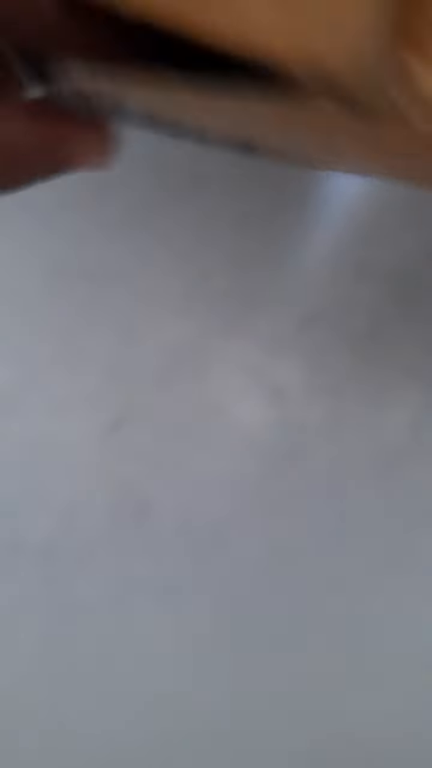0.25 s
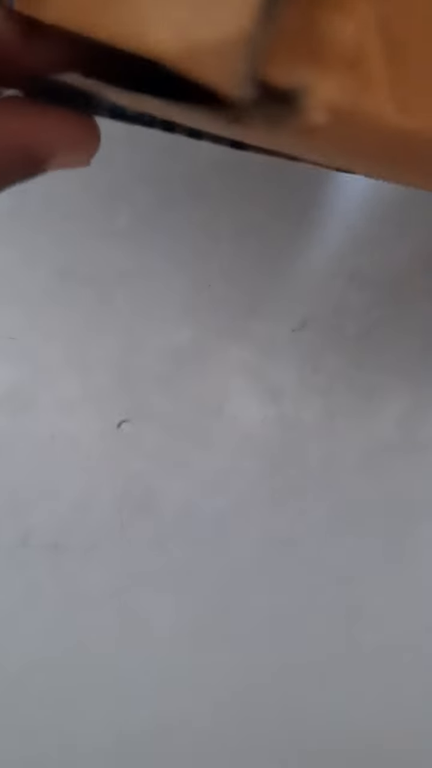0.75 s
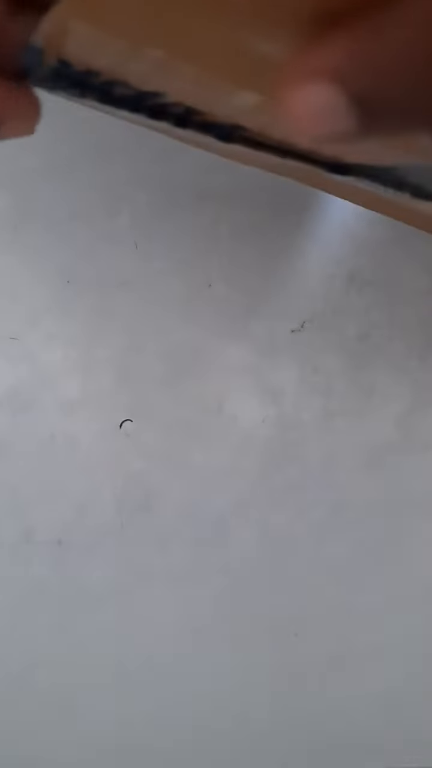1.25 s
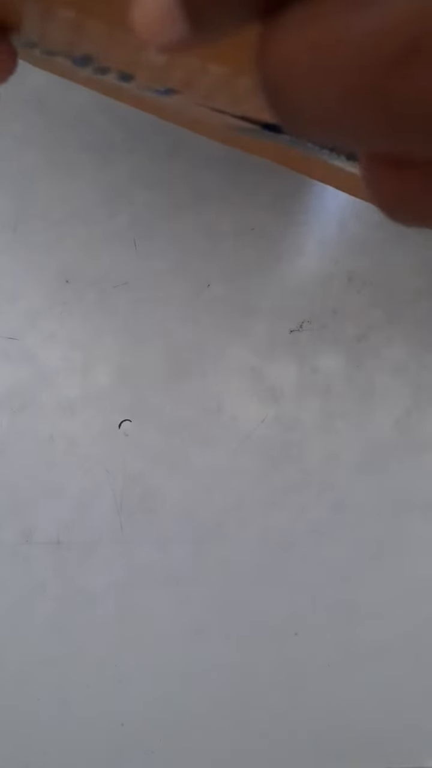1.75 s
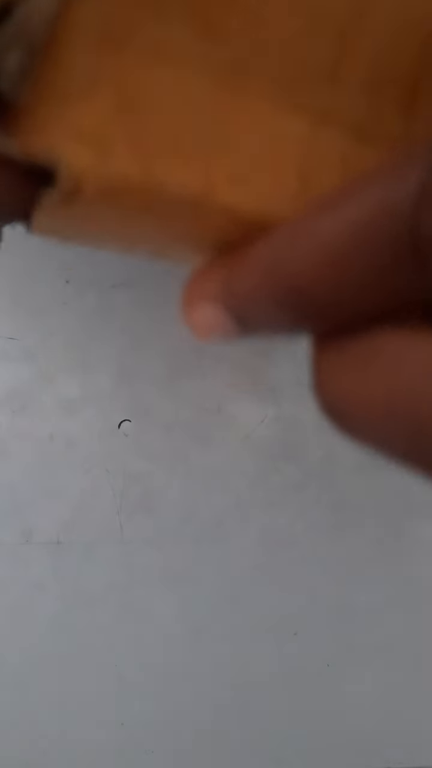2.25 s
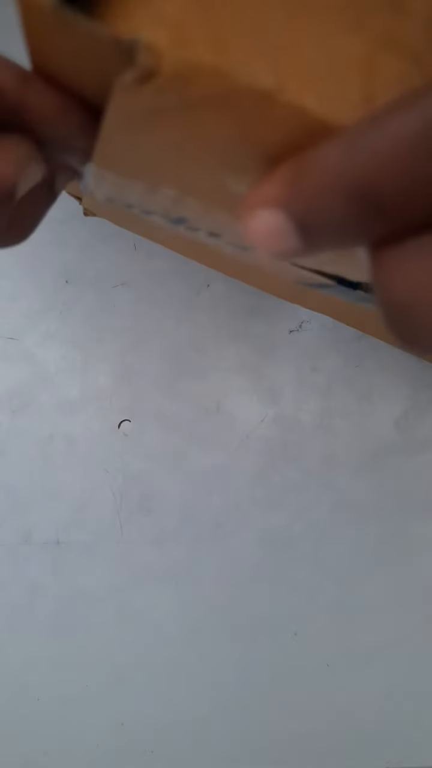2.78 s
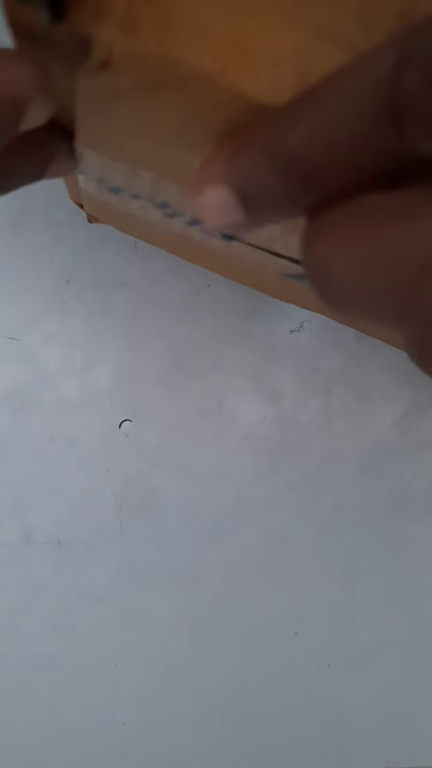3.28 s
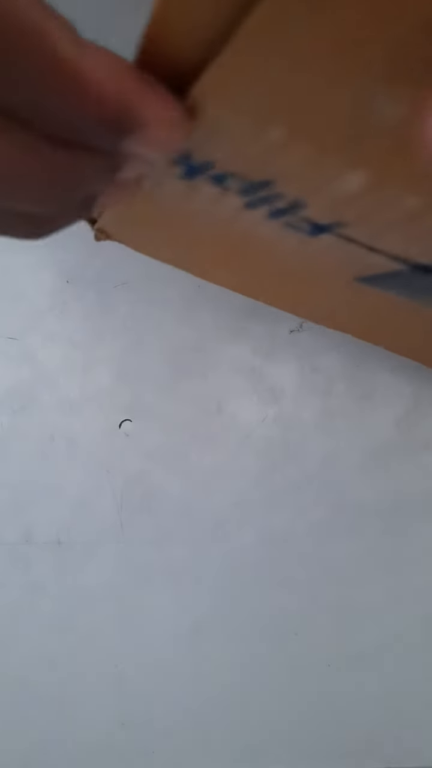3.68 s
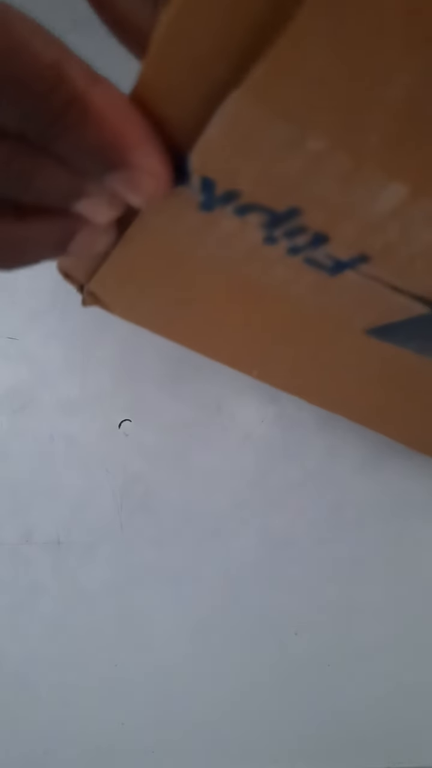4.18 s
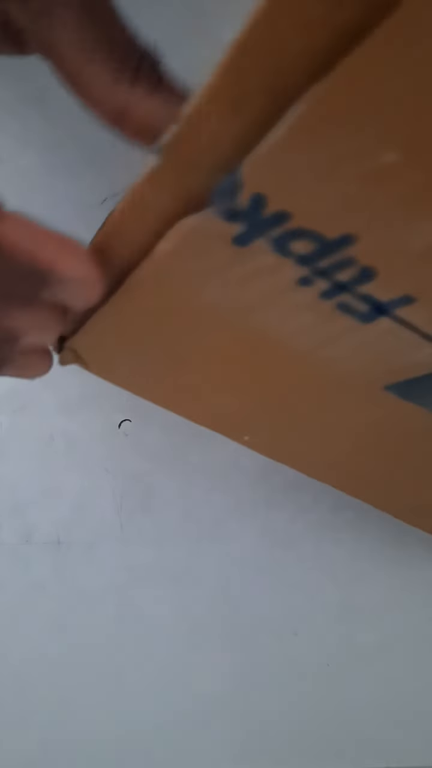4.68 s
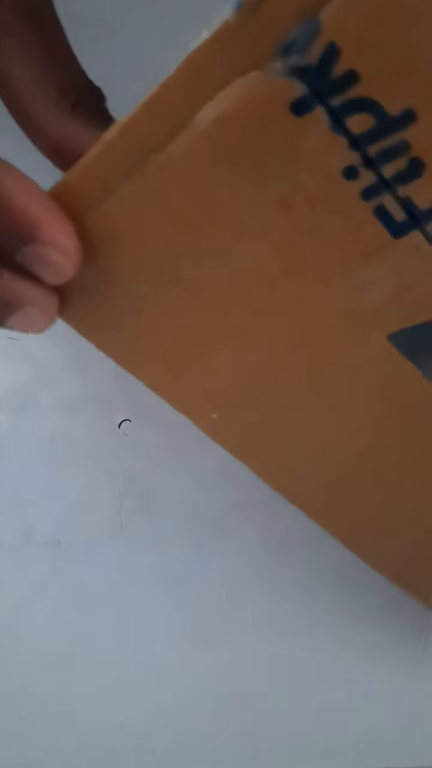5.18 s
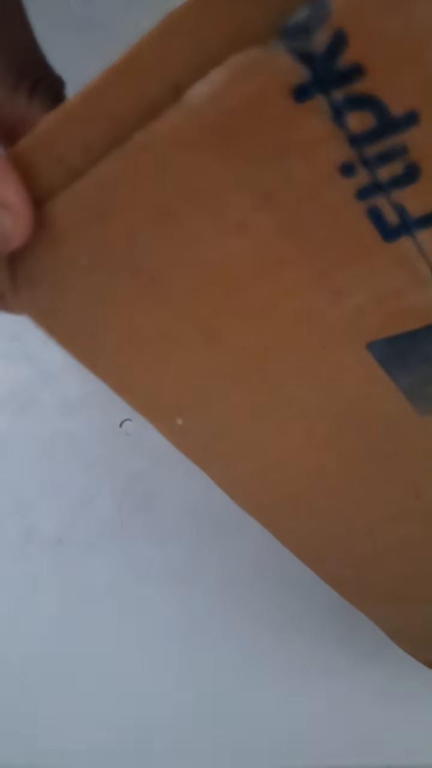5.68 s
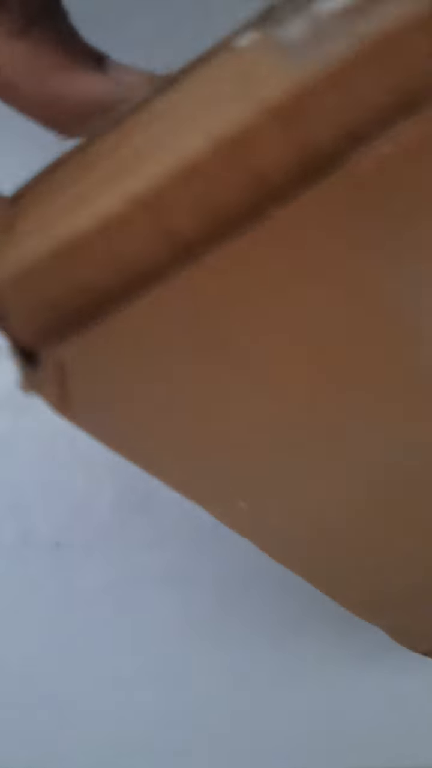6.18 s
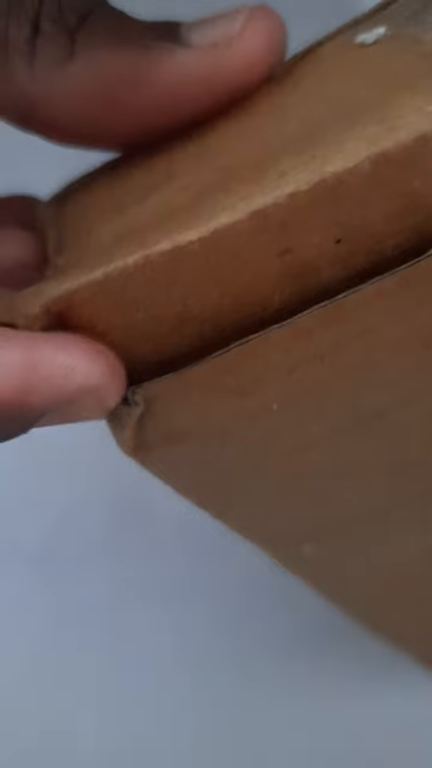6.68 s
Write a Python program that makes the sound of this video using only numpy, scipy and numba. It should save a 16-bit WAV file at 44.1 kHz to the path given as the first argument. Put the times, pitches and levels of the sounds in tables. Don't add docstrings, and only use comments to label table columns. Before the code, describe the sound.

Close, dry rustling of a cardboard box being handled, tape peeling in bright ticks and bursts, with one loud snap near the end.

```python
import sys
import numpy as np
from scipy import signal
from scipy.fft import rfft, irfft
from scipy.io import wavfile
from scipy.ndimage import uniform_filter1d, map_coordinates
from numba import njit

SR = 44100
rng = np.random.default_rng(int(sys.argv[2]) if len(sys.argv) > 2 else 0)


def linear_from_db(decibels):
    return 10 ** (np.asarray(decibels, float) / 20)


def wrap_up_sound(samples):
    columns = np.atleast_2d(samples).T
    tamed = np.clip(columns, -1, 1)
    steps = np.round(tamed * 32767).astype(np.int16)
    wavfile.write(sys.argv[1], SR, steps)


N = 306054


def rubbing():
    t = np.arange(N) / SR
    crack_db, rasp_db, air_db, flap_db = hands(t)
    tearing = tear_share(t)
    breaks = fibre_breaks(tearing)
    heard = near_port(breaks)
    whistle = even(band(heard, 5300, 9400), crack_db + 4.5)
    rasp = even(finger_gap(breaks, t), rasp_db + 6.5)
    fizz = even(band(heard, 9400, 17000), air_db + 5.5)
    board = even(gripped_board(breaks, tearing, t), flap_db + 3.5)
    return whistle + rasp + fizz + board + hollow(breaks, t) + rubs(breaks)


# t/s, crackle level/dB, rise/s, fall/s, bite/dB
DRAG_STROKES = [(0.351, -41, 0.079, 0.085, -3.5), (0.537, -51, 0.058, 0.084, 4.5),
                (1.021, -54, 0.2, 0.083, -12.5), (1.25, -64, 0.52, 0.25, -8.5),
                (1.572, -48, 0.071, 0.06, -1), (1.89, -68.5, 0.065, 0.071, 2.5),
                (2.0, -41.5, 0.035, 0.077, -11.5), (2.38, -40.5, 0.12, 0.065, -18.5),
                (2.62, -61.5, 0.22, 0.23, -8), (2.91, -64.5, 0.048, 0.096, -22),
                (2.972, -47.5, 0.029, 0.053, 2.5), (3.15, -65, 0.15, 0.068, -7),
                (3.233, -64, 0.052, 0.066, -6), (3.412, -37.5, 0.085, 0.058, -15),
                (3.351, -46, 0.051, 0.11, -14.5), (3.572, -54, 0.077, 0.039, -4.5),
                (3.63, -67, .06, 0.073, -10), (3.847, -62.5, 0.27, 0.06, -2),
                (4.09, -61.5, 0.087, 0.15, -3), (4.189, -57, 0.063, 0.097, 3.5),
                (4.329, -52.5, 0.13, 0.18, -15.5), (4.697, -60.5, 0.12, 0.59, 0.5),
                (5.3, -70, 0.24, 0.33, 2), (5.55, -74, 0.18, 0.12, -19), (5.577, -63.5, .025, .025, -12),
                (3.712, -57, .004, .008, -1), (6.236, -55, 0.092, 0.025, -3.5),
                (6.793, -66, 0.068, 0.34, 2.5)]
# t/s, crackle level/dB, rise/s, fall/s, bite/dB
PULL_STROKES = [(.06, -67.5, 0.13, 0.062, -3), (0.099, -39, 0.006, 0.063, -0.5),
                (0.16, -49, 0.058, 0.055, 2), (0.733, -57.5, 0.074, 0.12, 0), (.82, -78, 0.59, 0.62, 6),
                (1.45, -70.5, 0.17, 0.25, 5.5), (1.508, -46.5, 0.012, 0.1, -5),
                (1.785, -68.5, 0.033, 0.61, -11), (1.979, -34, 0.022, 0.065, -16),
                (2.069, -49.5, 0.044, 0.4, -12.5), (2.47, -63.5, 0.15, 0.25, 2),
                (3.74, -50.5, 0.042, 0.14, -1), (4.56, -60, 0.076, 0.078, -7.5),
                (4.74, -54.5, 0.038, 0.13, 7), (5.07, -62.5, 0.041, 1, -12.5),
                (5.767, -75.5, 0.15, 0.12, 9), (5.808, -31, 0.012, 0.062, -3),
                (5.817, -36, 0.015, 0.096, 0.5), (5.935, -58, 0.13, 0.1, 10.5),
                (6.022, -53, 0.29, 0.14, -13.5), (6.071, -49.5, 0.11, 0.14, 8), (6.16, -59, .05, 0.084, 12),
                (6.479, -54.5, 0.0083, 0.017, -15.5), (6.634, -64, 0.25, 0.075, -8),
                (6.687, -57, 0.065, 0.067, -0.5)]
# t/s, coarseness level/dB, thinness level/dB
CONTACT_TEXTURE = [(0, -8, -11), (.35, -8, -5), (.55, -22.5, -8.5), (1.17, -0.5, 0), (1.4, -5.5, -4.5),
                   (1.98, -7.5, -2.5), (2.4, 3, -3.5), (2.97, -8.5, -6), (3.4, -7.5, -3.5),
                   (4.3, -4.5, -4.5), (4.75, -3.5, -0.5), (4.97, -19, -16), (5.148, 2, -1),
                   (5.552, 4, -1.5), (5.799, 0.5, -6.5), (6.1, -8.5, -8.5), (6.501, -4.5, -7),
                   (6.94, -17.5, -1.5)]
DRAG_CURVE, PULL_CURVE, SHIFT_CURVE = 1.69, 0.99, 1.23
RASP_PER_BITE, AIR_PER_BITE, AIR_PER_FORCE = 0.52, 0.24, 0.22
RASP_STEEP, FLAP_STEEP = 1.043, 1.106


def hands(t):
    db = np.vstack([strokes(DRAG_STROKES, DRAG_CURVE), strokes(PULL_STROKES, PULL_CURVE)])
    rows = np.array(DRAG_STROKES + PULL_STROKES)
    peak_db, bite_db = rows[:, 1, None], rows[:, 4, None]
    s, coarse_db, thin_db = np.transpose(CONTACT_TEXTURE)
    rasp_db = joint(peak_db + RASP_STEEP * (db - peak_db) + RASP_PER_BITE * bite_db)
    air_db = joint(db + AIR_PER_BITE * bite_db + AIR_PER_FORCE * (peak_db + 47.5))
    flap_db = joint(peak_db + FLAP_STEEP * (db - peak_db) + bite_db)
    return joint(db), rasp_db + np.interp(t, s, coarse_db), air_db + np.interp(t, s, thin_db), flap_db


# t/s, share/0-1
TEAR_SHARE = [(0, 0.3), (1.9, 0.09), (2.0, 0.45), (2.8, 0.29), (2.95, 0.56), (3.1, 0.36), (3.4, 0.68),
              (3.65, 0.52), (4.3, 0.18), (4.7, 0.38), (5.0, 0.15), (5.85, 0.13), (6.94, 0.6)]


def tear_share(t):
    return np.clip(np.interp(t, *np.transpose(TEAR_SHARE)), 0, 1)


def fibre_breaks(tearing):
    slide = even(crackle(0.23, 0.38, 0.1), 0)
    tear = even(crackle(0.018, 1.8, 0.94), 0)
    jitter_db = (1.78 + 3.5 * tearing) * walk(60)
    return ((1 - tearing) * slide + tearing * tear) * linear_from_db(jitter_db)


def crackle(share, spread_db, smear_ms):
    excess = np.minimum(rng.exponential(size=N), 4.0)
    power = (rng.random(N) < share) * linear_from_db(2 * spread_db * excess)
    decay = np.exp(-1000 / (smear_ms * SR))
    return np.sqrt(signal.lfilter([1], [1, -decay], power)) * rng.standard_normal(N)


# f/Hz, level/dB
PORT_WHISTLE = [(2400, 3.5), (3500, -6), (5200, -0.5), (6900, 6), (7950, 14.5), (8600, 3.5), (9200, -7),
                (10500, -11), (12800, -1), (15500, -3.5)]


def near_port(x):
    return tint(x, PORT_WHISTLE)


# t/s, f/Hz
FINGER_CAVITY = [(0, 3700), (.95, 3300), (1.15, 3860), (1.3, 3800), (1.42, 4730), (1.55, 3650), (2.1, 4540),
                 (2.3, 4370), (2.42, 4600), (3.0, 3300), (3.4, 3670), (4.3, 4553), (4.85, 4200),
                 (5.05, 4400), (5.72, 4800), (5.85, 3300), (6.94, 4130)]


def finger_gap(breaks, t):
    rasp_hz = np.interp(t, *np.transpose(FINGER_CAVITY)) * 1.04 ** walk(9)
    gap = near_port(breaks * np.sign(rng.standard_normal(N)))
    rasp = sweep(band(gap, 2300, 6000, order=2), rasp_hz, 1.6)
    return sweep(rasp, rasp_hz, 1.6)


# t/s, f/Hz
GRIP_PITCH = [(0, 1180), (.36, 1310), (.53, 855), (.75, 745), (1.03, 1750), (1.19, 1750), (1.3, 1220),
              (1.75, 733), (1.96, 1460), (2.39, 1740), (2.5, 1230), (4.2, 1554), (4.35, 1910), (4.6, 820),
              (4.73, 1800), (5.3, 2190), (5.8, 1413), (6.94, 720)]


def gripped_board(breaks, tearing, t):
    board = wall(breaks) + flaps(breaks)
    flap_hz = np.interp(t, *np.transpose(GRIP_PITCH))
    gripped = sweep(sweep(board, flap_hz, 1.8), flap_hz, 1.8)
    return gripped + linear_from_db(6.5 - 30.4 * tearing) * board


# f/Hz, width/Hz, level/dB
WALL_MODES = [(463, 37, -12), (619, 173, 5.5), (741, 102, 7.5), (937, 116, -1)]


def wall(x):
    return ring(x, WALL_MODES)


# f/Hz, width/Hz, level/dB
FLAP_MODES = [(1167, 197, -4), (1458, 160, -1), (1817, 406, -2), (2178, 485, -7), (2480, 310, -14),
              (3300, 1900, -14.5)]


def flaps(x):
    return ring(x, FLAP_MODES)


# f/Hz, width/Hz, level/dB
HOLLOW_MODES = [(249.2, 42.5, -8.5), (306.3, 6.3, 10.5), (369, 138, -7.5)]
# t/s, level/dB, rise/s, fall/s
BOX_SHIFTS = [(.05, -71, 0.71, .45), (.103, -46.5, 0.0047, 0.14), (.164, -44, 0.061, 0.02),
              (.353, -45, 0.072, 0.13), (.541, -51.5, 0.067, 0.088), (.731, -57, 0.018, 0.1),
              (1.03, -69.5, 0.94, 0.12), (1.33, -71, 0.22, 0.16), (1.574, -55.5, 0.22, 0.18),
              (1.785, -63, 0.15, 0.22), (1.99, -56.5, 0.036, 0.11), (2.47, -63, 0.41, 0.87),
              (2.975, -51.5, .025, 0.11), (3.57, -69.5, 0.36, 0.8), (3.745, -52.5, 0.072, 0.21),
              (4.081, -63, 0.13, 0.07), (4.188, -58, .05, 0.073), (4.338, -66, 0.09, 0.43),
              (4.73, -56, 0.23, 0.31), (5.372, -70.5, 0.53, 0.18), (5.819, -47.5, 0.026, 0.21),
              (6.074, -51, 0.11, 0.16), (6.164, -45.5, 0.077, 0.047), (6.686, -48, 0.025, 0.041),
              (6.85, -63, 0.35, 0.71)]


def hollow(breaks, t):
    hollow_db = joint(strokes(BOX_SHIFTS, SHIFT_CURVE))
    damping = np.interp(t, [0.45, 0.6], [0, -0.6])
    boom = ring(breaks, HOLLOW_MODES) - damping * ring(breaks, HOLLOW_MODES[1:2])
    rumble = band(rng.standard_normal(N), 53, 130, order=2)
    return linear_from_db(hollow_db) * level(boom, 4.78) + linear_from_db(0.66 * hollow_db) * level(rumble, -33.5)


# t/s, level/dB, rise/s, fall/s, f/Hz
RUBBED_SPOTS = [(1.02, -73, 0.076, 0.15, 1800), (1.02, -52.5, 0.052, .04, 5640),
                (1.17, -67, .18, 0.17, 2350), (1.15, -63, .15, .25, 4300), (1.17, -64.5, .1, 0.23, 3450),
                (.56, -53.5, 0.085, 0.11, 1290), (1.03, -61, .1, .04, 3200), (1.32, -70, 0.07, .12, 1296),
                (1.46, -73, 0.066, .06, 1673), (1.55, -61, 0.017, .02, 4520), (2.06, -56, .06, 0.098, 2000),
                (1.99, -45, .03, .06, 1500), (5.88, -52, .05, .15, 1100), (6.72, -63.5, .06, .2, 1400),
                (2.273, -43.5, 0.0024, 0.0084, 3400), (2.3, -46, 0.1, 0.067, 5200),
                (2.55, -59, 0.12, 0.071, 1070), (3.07, -60.5, 0.036, 0.056, 1488),
                (3.16, -59, 0.016, 0.033, 1503), (3.24, -66.5, 0.054, 0.034, 1516),
                (3.415, -50, .04, 0.055, 3760), (3.555, -59, .06, 0.025, 1420),
                (3.37, -58, 0.097, 0.11, 1600), (4.1, -64, 0.059, .04, 2000),
                (4.2, -63, 0.069, 0.069, 1500), (4.33, -61, 0.084, 0.056, 2010),
                (4.745, -51, 0.018, 0.016, 1800), (5.4, -69, .15, 0.12, 2300),
                (5.26, -65.5, 0.18, 0.088, 2080), (4.72, -55, 0.12, 0.16, 1960),
                (5.37, -68, 0.1, 0.049, 1700), (3.77, -60, .07, 0.11, 1600),
                (5.76, -67.5, 0.091, 0.046, 1700), (5.82, -40, 0.029, 0.065, 1844),
                (6.079, -36, .005, .012, 1107), (2.463, -51, .003, .012, 2960), (5.9, -59, .07, 0.16, 1600),
                (6.155, -40, .005, .01, 3010)]


def rubs(breaks):
    out = np.zeros(N)
    for (_, _, rise, fall, hz), db in zip(RUBBED_SPOTS, strokes(RUBBED_SPOTS, DRAG_CURVE)):
        width_hz = hz / 4.6 * (1 + np.exp(-(rise + fall) / 0.09))
        mode = [(hz, width_hz, 0)]
        spot = ring(ring(breaks, mode), mode)
        out += linear_from_db(joint(db[None])) * level(spot, 0)
    return out


# t/s, peak level/dB, flap level/dB, wall level/dB
FILM_SNAPS = [(.5917, -43.5, -25, -2.5), (.9233, -48.5, -2.5, -3.5), (1.954, -38, -28, -29),
              (1.9724, -16, -18.5, -51), (2.0132, -18, -14.5, -53.5), (2.0998, -28.5, -25, -43),
              (2.1837, -31, -32, -49), (2.2723, -38, -13, -41), (2.3236, -38, -34, -35),
              (3.3947, -21.5, -15.5, -53), (4.1312, -30, -21, -44), (4.4803, -30.5, -57, -47),
              (4.665, -31, -8, -18), (4.6765, -42.5, 8, 6.5), (5.3658, -32.5, -19.5, -31),
              (5.9663, -32.5, -9.5, -21), (6.0337, -29.5, -8, -11.5)]
# t/s, peak level/dB, flap level/dB, wall level/dB
GLUE_SNAPS = [(.0973, -18.5, -18, -30), (.4647, -38, -27, -38), (1.5034, -33.5, -11, -26),
              (2.1278, -30, -17, -53), (2.4623, -40, 9, -5), (2.7262, -35, -12.5, -21),
              (2.9776, -32.5, -3.5, -12.5), (3.0589, -44, -4, -14), (3.572, -34, -12.5, -38),
              (4.1578, -46, 5.5, 2), (4.3261, -26, -46, -33), (4.3937, -37, -35, -28),
              (4.6319, -41.5, -11, -10), (4.7273, -22, -5.5, -28), (4.7932, -36, 2, -17),
              (4.91, -42.5, -1.5, -8), (4.934, -62.5, 14.5, 12.5), (4.78, -40.5, 4.5, -10),
              (.908, -61, 6, -8), (5.5645, -41, -42, -43), (5.8137, -9, -12.5, -12.5),
              (5.8201, -15, -7, -25), (6.0774, -27, 8.5, 5), (6.1535, -33.5, 5.5, 2.2),
              (6.863, -42.5, -11.5, -19)]
# t/s, peak level/dB, flap level/dB, wall level/dB
FIBRE_SNAPS = [(.2723, -64.5, -7, 20), (.7172, -37, -22, -4), (.83, -41.5, -16, -22),
               (1.6285, -46.5, 1, -5.5), (1.7407, -55, 3, 4), (2.2152, -35, -23, -50),
               (2.3745, -17, -20.5, -40), (2.3955, -40, -1.5, -5), (2.487, -34, -29, -22),
               (2.584, -38.5, -19, -23), (2.6375, -37, -22, -39), (3.49, -40, -14.5, -30),
               (3.7296, -39, -2, -5.5), (3.7713, -34.5, -6.5, -19), (4.8339, -26.5, -13, -28),
               (5.0484, -51, -5, -7), (5.8166, -9.5, -19, -16), (6.038, -29, -1, -15),
               (6.2723, -32, -23, -26), (6.6757, -43.5, -33, -5.5)]
# t/s, peak level/dB, flap level/dB, wall level/dB
NAIL_SKIPS = [
    (6.4737, -27, -25.5, -54),
    (6.4792, -24, -22, -52),
    (6.4847, -32, -10.5, -41),
]
# t/s, peak level/dB, flap level above it/dB
FILM_TICKS = [(0.8664, -44.5, -17), (1.4626, -53, -13), (1.9824, -37, -21), (1.9939, -27, -13),
              (2.0022, -23, -22), (2.03, -37, -15), (2.0364, -32, -15), (2.057, -36, -12.5),
              (2.082, -35, -18), (2.0928, -35, -25), (2.1053, -30, -32), (2.1374, -42, -17),
              (2.206, -32, -40), (2.2805, -35, -24), (2.3062, -36, -25), (2.3174, -33, -33),
              (2.333, -35, -25), (2.3453, -36, -31), (2.3512, -19.5, -32), (2.3854, -23, -24),
              (2.4004, -38, -16), (2.4174, -37, -25), (2.4214, -36, -26), (2.602, -46, -12),
              (2.6937, -39, -44), (2.714, -44, -32), (2.7526, -47, -21), (2.7801, -54, -16),
              (2.9492, -46, -11), (3.1333, -48, -26), (3.1526, -47.5, -3), (3.222, -50, -19),
              (3.3232, -45, -15), (3.3343, -41, -27), (3.3881, -29.5, -17.5), (3.4544, -43, -21),
              (4.2482, -39.5, -17), (4.2644, -44, -19), (4.2797, -43, -21), (4.2934, -43, -23),
              (4.3033, -37, -24), (4.3104, -47, -17), (4.322, -30, -28), (4.3284, -34, -30),
              (4.337, -40, -16), (4.343, -28.5, -27), (4.3484, -30, -21), (4.3564, -47, -24),
              (4.3972, -41, -27), (4.4114, -46, -28), (4.4176, -37.5, -34), (4.745, -33.5, -9),
              (5.8012, -29, -10), (5.81, -23, -14), (6.1762, -41.5, -5), (6.2662, -42.5, -29),
              (6.7281, -57, -15), (6.781, -50, -8.5), (6.8046, -51, -9), (6.8142, -49, -18)]
FILM_AIR_DB, GLUE_AIR_DB, FIBRE_AIR_DB, NAIL_AIR_DB, TICK_AIR_DB = 0.8, -7.5, -18, -40, -5
TICK_FLAP_DB, TICK_WALL_DB = 3.5, -14


def snaps():
    ticks = [(s, db, flap + TICK_FLAP_DB, flap + TICK_WALL_DB) for s, db, flap in FILM_TICKS]
    kinds = [(FILM_SNAPS, FILM_AIR_DB), (GLUE_SNAPS, GLUE_AIR_DB), (FIBRE_SNAPS, FIBRE_AIR_DB),
             (NAIL_SKIPS, NAIL_AIR_DB), (ticks, TICK_AIR_DB)]
    events = [(*row, db) for rows, db in kinds for row in rows]
    s, peak_db, flap_db, wall_db, air_db = np.transpose(events)[:, :, None]
    sample = np.arange(3000)
    fall_ms = 0.5 * 1.0145 ** (peak_db + 40.0) * 1.03 ** (flap_db + 17.5)
    fall = sample * 1000 / SR / fall_ms
    burst = rng.standard_normal((len(s), 3000)) * fall * np.exp(-fall)
    heard = near_port(burst)
    parts = [(band(heard, 4800, 9400), 0), (band(heard, 9400, 17000), air_db),
             (flaps(burst), flap_db), (wall(burst), wall_db)]
    shapes = 0
    for part, db in parts:
        unit = part / np.abs(part).max(axis=1, keepdims=True)
        shapes = shapes + linear_from_db(peak_db + db + 4.5) * unit
    out = np.zeros(N + 3000)
    np.add.at(out, (s * SR).astype(int) + sample, shapes)
    return out[:N]


# t/s, peak level/dB, f/Hz
FLOOR_KNOCKS = [
    (0.13, -62, 40),
    (0.36, -62, 42),
    (0.14, -53.5, 116),
    (0.356, -55, 90.5),
    (0.75, -62, 87),
    (1.985, -55, 69.5),
    (3.548, -61.5, 89),
    (6.088, -51, 106),
    (6.168, -47.5, 63),
]


def thuds():
    out = np.zeros(N)
    for s, peak_db, hz in FLOOR_KNOCKS:
        t = np.clip(np.arange(N) / SR - s, 0, None)
        push = np.minimum(t / 0.0019, 1)
        decay = np.exp(-np.log(1000) * t / 0.16)
        out += linear_from_db(peak_db + 8) * push * decay * np.sin(2 * np.pi * hz * t)
    return band(out, 30, 360, order=2)


# f/Hz, level/dB
FAR_PORT_TONE = [(60, -22), (300, -14.5), (900, -11), (2200, -8), (3700, -13.5), (5300, -16.5),
                 (6900, -20.5), (7950, -28.5), (9200, -14.5), (10500, -9), (13000, -14)]


def far_port(near, echo):
    late = np.roll(near, 21)
    far = linear_from_db(-23) * late + linear_from_db(-2.5) * echo
    far += linear_from_db(-4.0) * band(late, 140, 830, order=1)
    return tint(far, FAR_PORT_TONE)


def room(near):
    t = np.arange(SR // 2) / SR
    t60_s = np.array([[0.076], [0.26]])
    decay = np.minimum(t / 0.0027, 1) * np.exp(-np.log(1000) * t / t60_s)
    echo = rng.standard_normal((2, 2, len(t))) * decay
    echo /= np.sqrt(np.sum(echo ** 2, axis=2, keepdims=True))
    moved = map_coordinates(near, [np.arange(N) + 8 * walk(4)], order=3)
    turn = 1.71 * walk(3)
    first = signal.fftconvolve((moved * np.cos(turn))[None], echo[0], axes=1)
    second = signal.fftconvolve((moved * np.sin(turn))[None], echo[1], axes=1)
    return (first + second)[:, :N]


# f/Hz, level/dB per Hz
LEFT_AIR = [(25, -29.5), (60, 8.5), (150, -1), (280, 2.5), (500, -8), (1500, -10.5), (3500, -28.5),
            (6000, -19), (7900, -7), (9200, -23), (16000, -36)]
# f/Hz, level/dB per Hz
RIGHT_AIR = [(25, -57.5), (60, -1), (150, -13.5), (280, -12), (500, -16), (1500, -19), (3500, -39),
             (6000, -32), (7900, -35), (9200, -34.5), (16000, -26)]


def air():
    left, other = rng.standard_normal((2, N))
    right = band(left, 17, 330, order=1) + 1.83 * other
    sway = linear_from_db(0.47 * walk(6.2) + 1.1 * walk(20))
    return level(np.array([tint(left, LEFT_AIR), tint(right, RIGHT_AIR)]), -72.5) * sway


def strokes(rows, curve):
    s, db, rise, fall = np.transpose(rows)[:4, :, None]
    late = np.arange(0, N + 64, 64) / SR - s
    return db - 20 * np.where(late < 0, -late / np.abs(rise), late / np.abs(fall)) ** curve


def joint(db):
    total = 10 * np.log10(np.sum(linear_from_db(2 * db), axis=0) + 1e-11)
    return np.interp(np.arange(N) / 64, np.arange(len(total)), total)


def even(x, db):
    return linear_from_db(db) * x / np.sqrt(uniform_filter1d(x ** 2, 5000))


def level(x, db):
    return x * linear_from_db(db) / np.sqrt(np.mean(x ** 2))


def walk(rate):
    hold = int(SR / rate)
    steps = np.repeat(rng.standard_normal(N // hold + 1), hold)
    return uniform_filter1d(steps, hold)[:N]


def tint(x, table):
    hz, db = np.transpose(table)
    grid_hz = np.arange(2049) * SR / 4096 + 1
    log_gain = np.interp(np.log(grid_hz), np.log(hz), db) * np.log(10) / 20
    cepstrum = irfft(log_gain)
    cepstrum[1:2048] *= 2
    cepstrum[2049:] = 0
    impulse = irfft(np.exp(rfft(cepstrum)))[:2048]
    impulse = impulse.reshape((1,) * (x.ndim - 1) + (-1,))
    return signal.fftconvolve(x, impulse, axes=-1)[..., :x.shape[-1]]


def band(x, lo_hz, hi_hz, order=3):
    return signal.sosfilt(signal.butter(order, [lo_hz, hi_hz], "band", fs=SR, output="sos"), x)


def ring(x, modes):
    out = 0
    for k, (hz, width, db) in enumerate(modes):
        b, a = signal.iirpeak(hz, hz / width, SR)
        out = out + (-1) ** k * linear_from_db(db) * signal.lfilter(b, a, x)
    return out


@njit
def sweep(x, hz, sharp):
    y = np.empty(len(x))
    b, l, k = 0., 0., 1 / sharp
    for i in range(len(x)):
        g = np.tan(np.pi * hz[i] / SR)
        v = (b + g * (x[i] - l)) / (1 + g * (g + k))
        b, l, y[i] = 2 * v - b, l + 2 * g * v, k * v
    return y


def scene():
    near = rubbing() + snaps() + thuds()
    echo = room(near)
    return np.array([near + linear_from_db(-17) * echo[0], far_port(near, echo[1])]) + air()


def top_cut(x):
    return signal.sosfilt(signal.butter(12, 17160, fs=SR, output="sos"), x)


def record(dry):
    cut = signal.sosfilt(signal.ellip(8, 0.2, 60, 15900, fs=SR, output="sos"), dry)
    return top_cut(cut)


dry = scene()
out = record(dry)
wrap_up_sound(out)
```